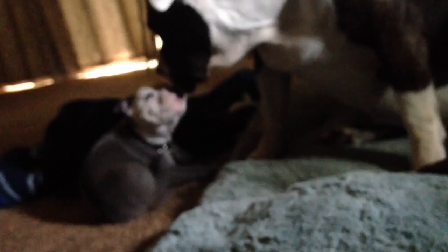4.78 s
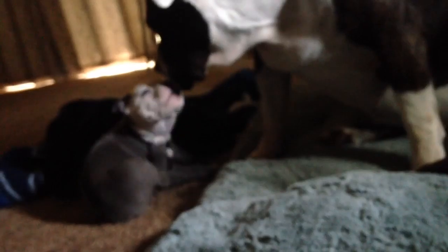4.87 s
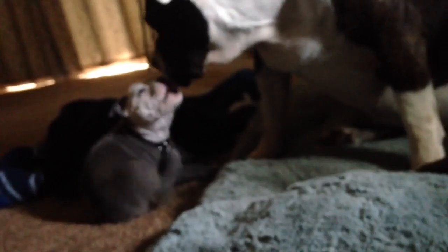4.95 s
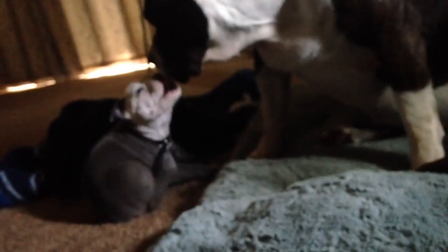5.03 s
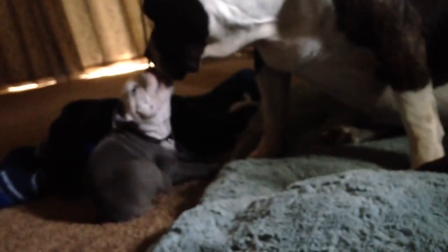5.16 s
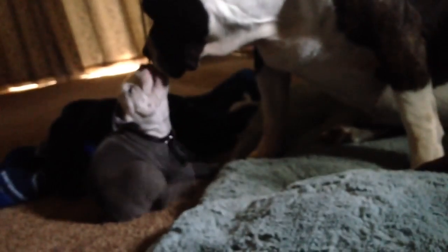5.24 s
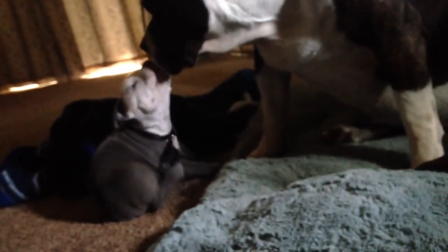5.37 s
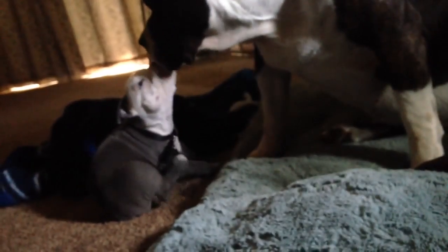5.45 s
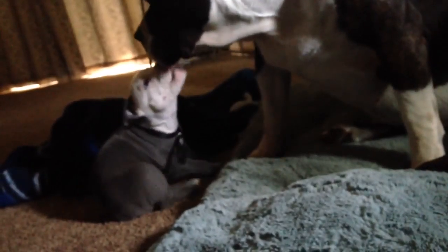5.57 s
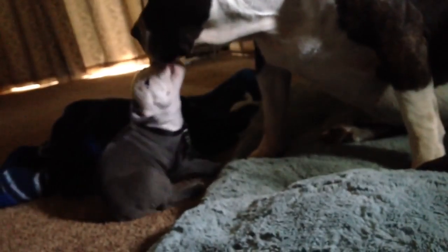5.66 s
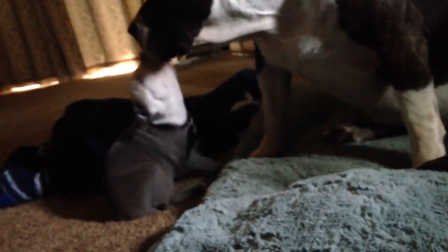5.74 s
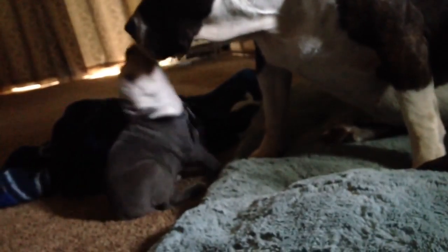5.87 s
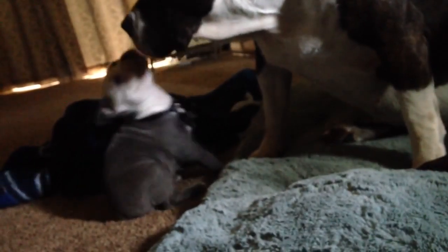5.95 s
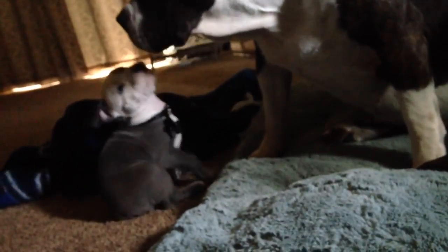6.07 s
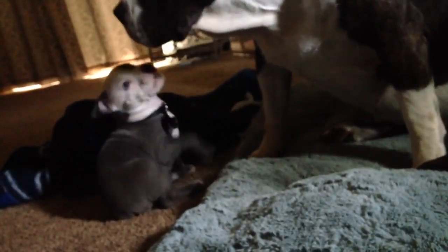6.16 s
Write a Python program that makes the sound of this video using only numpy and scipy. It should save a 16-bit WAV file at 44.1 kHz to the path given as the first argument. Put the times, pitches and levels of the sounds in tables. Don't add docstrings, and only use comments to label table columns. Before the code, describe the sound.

Small metal collar tags jingle and click in quick bursts as a dog fidgets on carpet, over faint house hum, with one loud bump.

```python
import sys
import numpy as np
from scipy import signal
from scipy.fft import rfft, irfft
from scipy.io import wavfile
from scipy.ndimage import uniform_filter1d

SR = 44100
rng = np.random.default_rng(int(sys.argv[2]) if len(sys.argv) > 2 else 0)


def magnitude_from_level(level_db):
    exponent = np.asarray(level_db, float) / 20
    return 10 ** exponent


def put_to_file(sound):
    columns = np.atleast_2d(sound).T
    safe = np.clip(columns, -1, 1)
    whole_steps = np.round(safe * 32767)
    wavfile.write(sys.argv[1], SR, whole_steps.astype(np.int16))


N = 273596
TIME = np.arange(N) / SR
TURN_OVER_S = 3.22


def turned(s):
    return int(s > TURN_OVER_S)


def level(x, db):
    return x * magnitude_from_level(db) / np.sqrt(np.mean(x ** 2))


def band(x, hz, width):
    return signal.lfilter(*signal.iirpeak(hz, hz / width, fs=SR), x)


def walk(rate):
    hold = int(SR / rate)
    steps = np.repeat(rng.standard_normal(N // hold + 1), hold)
    smooth = uniform_filter1d(uniform_filter1d(steps, hold), hold)
    return level(smooth[:N], 0)


def add(out, s, grain):
    i = int(s * SR)
    out[i:i + len(grain)] += grain[:N - i]


def decay(t, t60):
    return np.exp(-np.log(1000) * t / t60)


def ring(hz, t60, phase=0, touch_s=1, touch_db=0):
    t = TIME[:6000]
    muted = magnitude_from_level(touch_db * np.clip((t - touch_s) / 0.0043, 0, 1))
    swell = 1 - np.exp(-t / 0.00069)
    return np.sin(2 * np.pi * (hz * t + phase)) * decay(t, t60) * swell * muted


def burst(hz, width, t60):
    t = TIME[:1500]
    crack = rng.standard_normal(len(t)) * (decay(t, t60) + 1.4 * np.exp(-t / 0.000093))
    crack = band(band(crack, hz, width), hz, 0.51 * width)
    return crack / np.abs(crack).max()


def drone(hz, wander, rough):
    tone = np.sqrt(2) * np.sin(2 * np.pi * np.cumsum(hz * (1 + wander * walk(46))) / SR)
    blur = band(band(band(rng.standard_normal(N), hz, 28), hz, 77), hz, 110)
    return level(tone + level(blur, 0) * rough, 0)


# (time [s], level [dB])
RUMBLE = [(0.0, -50.5), (0.2, -64.5), (0.62, -52.5), (0.85, -58), (1.2, -53), (1.6, -56), (2.0, -63),
          (2.3, -57), (2.55, -59), (2.8, -55), (3.3, -56), (3.52, -65.5), (3.7, -48), (4.05, -54.5),
          (4.5, -66.5), (4.85, -54.5), (5.5, -57.5), (6.19, -59)]
# (time [s], level [dB])
HUM = [(0, -64), (.2, -56), (.45, -66.5), (.7, -59), (1.35, -57.5), (1.65, -64), (2.0, -59.5), (2.8, -64),
       (3.1, -56.5), (3.6, -68), (3.85, -57), (4.1, -75), (4.9, -60.5), (6.19, -67)]


def drones():
    rumble = drone(63, 0.0486, 0.7) * magnitude_from_level(np.interp(TIME, *np.transpose(RUMBLE)))
    hum = drone(120, 0.012, 0.71) * magnitude_from_level(np.interp(TIME, *np.transpose(HUM)))
    return rumble + hum


# (time [s], pitch [Hz], level [dB])
WHINE = [
    (0, 697, -76),
    (.5, 700, -76.5),
    (.62, 699.5, -69),
    (1.802, 709.5, -69),
    (6.05, 708.3, -69),
    (6.2, 708.3, -72),
]
# (multiple of the pitch, level [dB])
WHINE_LINES = [(1, -1.5), (2, -13), (3, -13.5)]


def fan_whine():
    s, fan_hz, fan_db = np.transpose(WHINE)
    speed = np.interp(TIME, s, fan_hz) * (1 + 0.000983 * walk(6))
    turns = np.cumsum(speed) / SR
    whine = np.zeros(N)
    for multiple, db in WHINE_LINES:
        whine += magnitude_from_level(db + 0.7 * walk(9.9)) * np.sin(2 * np.pi * multiple * turns)
    return np.sqrt(2) * whine * magnitude_from_level(np.interp(TIME, s, fan_db))


# (centre [Hz], width [Hz], level [dB])
DUCTS = [(86, 13.6, -61.5), (236.8, 18, -76.5), (1127, 67, -79.5), (1874, 220, -78), (3233, 16, -86.5)]
# (frequency [Hz], density [dB per Hz])
HISS = [(88, -35), (150, -4.5), (239, -6), (351, -15), (488, -11.5), (616, -17.5), (719, -13), (907, -17),
        (2130, -20.5), (3070, -25), (15300, -31)]


def air():
    ducts = sum(level(band(rng.standard_normal(N), hz, width), db) for hz, width, db in DUCTS)
    hz = np.arange(N // 2 + 1) * SR / N + 1
    table_hz, table_db = np.transpose(HISS)
    shape = magnitude_from_level(np.interp(np.log(hz), np.log(table_hz), table_db)) * (hz > 75)
    hiss = irfft(rfft(rng.standard_normal(N)) * shape, N)
    hiss *= magnitude_from_level(-70.5) / np.sqrt(np.sum(shape[hz > 900] ** 2) / len(hz))
    return ducts + hiss * magnitude_from_level(0.12 * walk(1.74))


# (time [s], push [dB], contact [ms], rise [share of contact], swing back [share of push])
BUMPS = [
    (4.2132, -2.5, 0.86, 0.062, 0.12),
]


def bumps():
    out = np.zeros(N)
    lead = 1000
    ms = (np.arange(2400) - lead) * 1000 / SR
    for s, db, contact, share, swing in BUMPS:
        turn = ms / contact
        after = np.maximum(turn, 0)
        rise = np.exp(-(np.minimum(turn, 0) / share) ** 2)
        push = rise * (np.exp(-after ** 2.8) + 0.45 * np.exp(-after / 0.022))
        back = -swing * np.exp(-(turn - 4) ** 2) - 0.09 * np.exp(-((turn - 7) / 5.1) ** 2)
        lean = -0.07 * np.exp(-((turn + 8) / 5.2) ** 2) + 0.071 * np.exp(-((turn + 2) / 2.6) ** 2)
        drag = level(band(band(rng.standard_normal(len(ms)), 330, 360), 340, 540), 0)
        fur = 0.04 * drag * np.exp(-np.abs(turn + 0.85) / 7.2)
        add(out, s - lead / SR, magnitude_from_level(db) * (push + back + lean + fur))
    case_tap = ring(600, 0.006) + 0.57 * ring(1640, 0.0049)
    add(out, 3.6849, magnitude_from_level(-32) * case_tap)
    vented = signal.sosfilt(signal.butter(2, 45, "high", fs=SR, output="sos"), out)
    return signal.sosfilt(signal.butter(6, 12500, fs=SR, output="sos"), vented)


# (time [s], peak [dB], pitch [Hz])
TICKS = [(1.0352, -53, 1410), (1.9598, -47, 3320), (2.1695, -51.5, 1450), (2.591, -54, 2390),
         (2.7852, -50, 2255), (2.794, -50, 2120), (3.0007, -45, 2310), (3.1877, -47, 3330),
         (3.2053, -46, 2500), (3.398, -52.5, 3180), (3.8197, -50, 3200), (3.854, -43.5, 2340),
         (4.3293, -54.5, 2180), (4.79, -53, 3000), (4.926, -54, 2000), (4.96, -56, 2000)]


def ticks(touches):
    out = np.zeros(N)
    for s, db, hz in TICKS:
        add(out, s, magnitude_from_level(db) * burst(hz, 3500, 0.02))
    for s, db, *_ in touches:
        add(out, s, magnitude_from_level(db - 17.5) * burst(2650, 2600, 0.0044))
    return out


# (time [s], length [s], fine rattle level [dB])
SHAKE = [(0, 0.057, -85), (0.38, 0.028, -86), (0.837, 0.078, -66), (1.034, 0.038, -64), (1.11, 0.048, -69),
         (1.186, 0.031, -74), (1.277, 0.13, -71), (1.42, 0.065, -71.5), (1.553, 0.03, -74.5),
         (1.741, 0.043, -78.5), (1.936, 0.095, -71), (2.159, 0.048, -65), (2.36, 0.079, -74.5),
         (2.575, 0.032, -70), (2.776, 0.048, -67), (2.97, 0.049, -68), (3.158, 0.072, -69),
         (3.373, 0.073, -66.5), (3.57, 0.096, -75.5), (3.8, 0.083, -70.5), (4.038, 0.071, -71.5),
         (4.257, 0.15, -74.5), (4.534, 0.064, -72.5), (4.778, 0.064, -68.5), (4.989, 0.13, -73.5),
         (5.239, 0.13, -74.5), (5.473, 0.043, -73), (6.114, 0.038, -77)]
# (frequency [Hz], t60 [s])
HIGH_MODES = [(9320, 0.013), (12370, 0.032), (13210, 0.04), (14830, 0.055)]


def rattle():
    struck = rng.random(N) < 1300 / SR
    uneven = magnitude_from_level(np.minimum(0.73 * rng.exponential(size=N), 12))
    chatter = struck * rng.standard_normal(N) * uneven
    body = level(band(band(chatter, 6600, 5700), 6200, 6000), 0)
    bright = level(band(band(chatter, 10700, 5500), 12400, 10000), 0)
    body = body + bright * magnitude_from_level(np.where(TIME > TURN_OVER_S, -11, -6))
    for hz, _ in HIGH_MODES:
        body += level(band(chatter, hz, 250), -19)
    shaking = np.zeros(N)
    for s, length, db in SHAKE:
        swell = signal.windows.tukey(int(1.32 * length * SR), 0.85)
        add(shaking, max(s - 0.24 * length, 0), magnitude_from_level(db + 6) * swell)
    return body * shaking * magnitude_from_level(1.9 * walk(90))


# (time [s], clack [dB], low mode [dB])
CLACKS = [(0.3909, -55.5, -80), (0.4098, -57, -77), (0.8395, -37, -50), (0.847, -43, -60),
          (.8523, -40.5, -49), (0.868, -46, -67), (.883, -49, -70), (.9964, -60, -57), (1.036, -47, -61),
          (1.0426, -49, -85), (1.056, -53, -54), (1.109, -38.5, -53), (1.1297, -51, -68),
          (1.1918, -55, -50), (1.202, -61, -47), (1.2098, -46.5, -46), (1.2364, -56, -61),
          (1.2904, -58, -56), (1.3115, -51, -57), (1.336, -55, -53), (1.354, -46, -47.5),
          (1.4053, -45, -45), (1.4118, -46, -39.5), (1.4158, -36, -85)]
# (time [s], clack [dB], low mode [dB])
SCRATCH_CLACKS = [(1.961, -52, -58), (1.969, -38, -48), (1.9812, -31.5, -36), (2.1686, -55, -60),
                  (2.184, -49, -45), (2.1905, -37.5, -52), (2.3905, -49.5, -73), (2.403, -67, -54.5),
                  (2.5916, -59, -67), (2.608, -35, -43), (2.7862, -43, -46), (2.7935, -40, -58),
                  (2.806, -39.5, -47), (2.9894, -54, -47), (2.9947, -39.5, -45), (3.0021, -60, -37),
                  (3.008, -32, -40), (3.0491, -57, -60), (3.1383, -61, -60), (3.1883, -52, -71),
                  (3.2057, -59, -60)]
# (time [s], clack [dB], low mode [dB])
TURNED_CLACKS = [(3.235, -45.5, -53), (3.372, -53, -80), (3.3938, -48, -77), (3.413, -48, -83),
                 (3.612, -48, -74), (3.621, -41, -78), (3.821, -44, -74), (3.8567, -52, -77),
                 (3.883, -55, -58), (4.2883, -54, -55), (4.3307, -64, -53), (4.344, -51.5, -56),
                 (4.546, -60, -81), (4.6153, -51, -54), (4.7855, -57, -80), (4.8477, -48, -43.5),
                 (4.861, -52, -49), (4.994, -54.5, -84), (5.072, -56, -57), (5.1074, -48.5, -48),
                 (5.279, -44.5, -74), (5.298, -55, -85), (5.831, -61.5, -83), (6.137, -67, -66),
                 (6.145, -57, -76)]


def contacts():
    firm = np.array(CLACKS + SCRATCH_CLACKS + TURNED_CLACKS)
    a, b = rng.standard_normal((len(firm), 2)).T
    bounce_s, bounce_db = 0.0063 * np.exp(0.4 * a), -16.5 + 3 * b
    soft = firm + np.transpose([bounce_s, bounce_db, bounce_db])
    rows = np.vstack([np.c_[firm, np.zeros(len(firm))], np.c_[soft, np.ones(len(firm))]])
    return rows[np.argsort(rows[:, 0])]


# (frequency [Hz], t60 [s])
LOW_MODES = [
    (4934, 0.022),
    (4329, 0.013),
]
# (frequency [Hz], level [dB], t60 [s])
SIDE_MODES = [(4820, -13, .02), (5600, -11, .016), (6750, -13, .016), (7500, -18, .012), (8500, -21, .01)]


def clacks(touches):
    out = np.zeros(N)
    for s, clack_db, low_db, _ in touches:
        clack_hz = (5980, 6200)[turned(s)] * (1 + 0.036 * rng.standard_normal())
        add(out, s, magnitude_from_level(clack_db + 4.5) * burst(clack_hz, 2560, 0.012))
        hz, t60 = LOW_MODES[turned(s)]
        low_hz = hz * (1 + 0.017 * rng.standard_normal())
        add(out, s, magnitude_from_level(low_db + 6) * ring(low_hz, t60, rng.random()))
        for (hz, db, t60), (a, b, c) in zip(SIDE_MODES, rng.standard_normal((5, 3))):
            add(out, s, magnitude_from_level(clack_db + db + 3.5 * b) * ring(hz * (1 + 0.03 * a), t60, c))
    add(out, 4.412, magnitude_from_level(-67.5) * ring(4220, 0.62, touch_s=0.13, touch_db=-12))
    return out


# (time [s], round tag [dB], flat tag [dB], lean to lower modes [dB])
CLINKS = [(.8401, -51, -49, -14), (.8526, -44, -45.5, -2), (.8685, -68, -62, 8), (.8855, -64, -64, 5),
          (1.0366, -55, -53.5, 20), (1.0441, -58, -90, 9), (1.0566, -64, -61, 8), (1.111, -63.5, -63, 11),
          (1.1953, -59.5, -54, -3), (1.2102, -59.5, -57.5, -9), (1.312, -67, -74, 16),
          (1.341, -69, -60, -22), (1.3559, -57, -50.5, 10), (1.4063, -50, -43, 3), (1.4173, -50, -55, -1),
          (1.9595, -66, -69.5, 17), (1.9675, -56, -58, 8), (1.983, -41.5, -44, -1), (2.185, -69.5, -65, -3),
          (2.191, -67, -71, -10), (2.4035, -76, -61, 13), (2.5916, -63, -69.5, 13), (2.6091, -54, -55, -1),
          (2.7907, -58.5, -59, 5), (2.7961, -61, -59, 1.5), (2.8071, -53, -50, -9),
          (2.9972, -58, -54.5, -10), (3.0027, -46, -47, 11), (3.0092, -50, -49, 4), (3.1878, -70, -77, 17)]
# (time [s], round tag [dB], flat tag [dB], lean to lower modes [dB])
TURNED_CLINKS = [(3.2356, -59, -49, -12), (3.3926, -61.5, -75, 9), (3.4142, -66.5, -73, -1),
                 (3.6208, -62, -72, 33), (3.82, -67, -69, 24), (3.8809, -50.5, -64, 17),
                 (4.2893, -71, -80, 15), (4.3317, -65, -72, -15), (4.3426, -51, -59, 3),
                 (4.3636, -64.5, -77, 3), (4.4115, -63, -75, 7), (4.4237, -53, -72, -2),
                 (4.616, -52, -55, 1), (4.8468, -38.5, -54, 1.5), (4.8602, -66, -58.5, 18),
                 (4.9014, -64, -76, -3), (5.1082, -54, -46, -2), (5.279, -59, -68, 3),
                 (5.4835, -73, -72, 15), (6.145, -54.5, -67, 4)]


def strikes(touches):
    grazes = []
    for s, db, _, bounce in touches:
        if bounce:
            grazes.append((s, db - 23.5, db - 23.5, 4 * rng.standard_normal()))
    rows = []
    for s, round_db, flat_db, lean_db in sorted(CLINKS + TURNED_CLINKS + grazes):
        # (share of lean, offset dB), face up and turned
        share, offset_db = ((0.36, 0), (0.23, 16.5))[turned(s)]
        split_db = share * lean_db + offset_db
        rows.append((s, round_db + lean_db / 2, flat_db + split_db / 2,
                     flat_db - split_db / 2, round_db - lean_db / 2))
    return rows


def clinks(rows):
    out = np.zeros(N)
    gaps = np.diff([row[0] for row in rows], append=9)
    for (s, *mode_db), gap in zip(rows, gaps):
        strongest_db = max(mode_db)
        share = (1.05, 0.9)[turned(s)]
        for (hz, t60), db, (a, b, c) in zip(HIGH_MODES, mode_db, rng.standard_normal((4, 3))):
            detuned = hz * (1 + 0.002 * a)
            free = magnitude_from_level(0.35 * max(db - strongest_db, -20))
            main_t60 = share * t60 * free * np.exp(0.37 * b)
            add(out, s, magnitude_from_level(db + 9.5) * ring(detuned, main_t60, c, gap, touch_db=-2))
            for side in (-1, 1):
                twin_hz = detuned * (1 + side * 0.016 * rng.uniform(0.4, 1.6))
                add(out, s, magnitude_from_level(db - 2.5) * ring(twin_hz, 0.45 * t60 * free, rng.random()))
        add(out, s, magnitude_from_level(strongest_db - 1.5) * burst(9070, 2200, 0.021))
        add(out, s, magnitude_from_level(strongest_db - 3.5) * burst(13500, 7000, 0.013))
    return out


def carpeted_room(tags):
    t = TIME[:12000]
    tail = rng.standard_normal(len(t)) * decay(t, 0.14) * (t > 0.003)
    tail *= magnitude_from_level(-17) / np.sqrt(np.sum(tail ** 2))
    return signal.fftconvolve(tags, tail)[:N]


def scene():
    touches = contacts()
    metal = rattle() + clacks(touches) + clinks(strikes(touches))
    metal = signal.sosfilt(signal.butter(8, 4300, "high", fs=SR, output="sos"), metal)
    tags = metal + ticks(touches)
    house = drones() + fan_whine() + air()
    return (house + bumps() + tags + carpeted_room(tags))[None]


def top_cut(x):
    return signal.sosfilt(signal.butter(12, 16680, fs=SR, output="sos"), x)


def record(dry):
    clipped = np.clip(dry, -0.95, 0.95)
    mix = signal.sosfilt(signal.ellip(8, 0.3, 24, 15250, fs=SR, output="sos"), clipped)
    return top_cut(mix)


dry = scene()
out = record(dry)
put_to_file(out)
```